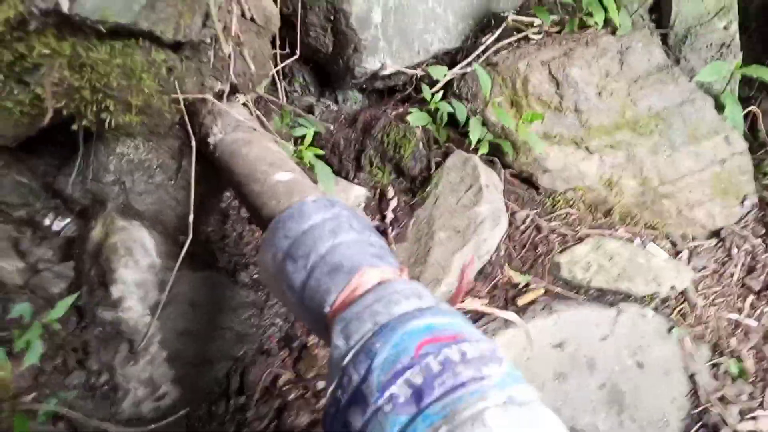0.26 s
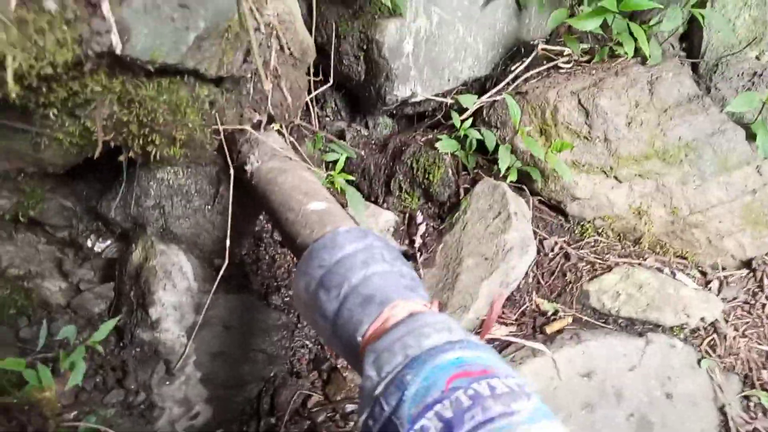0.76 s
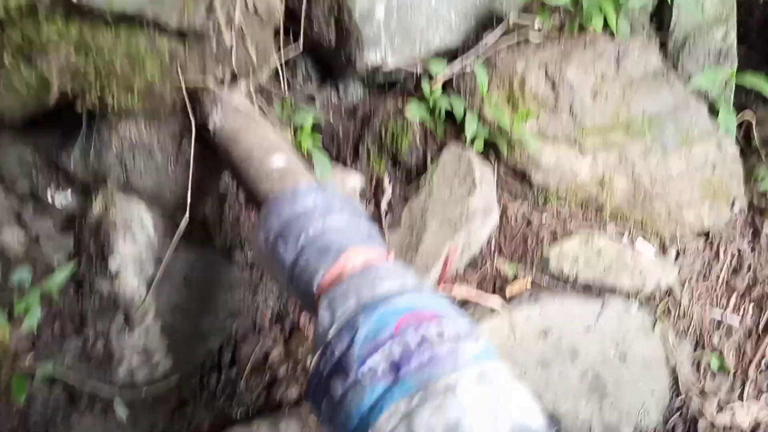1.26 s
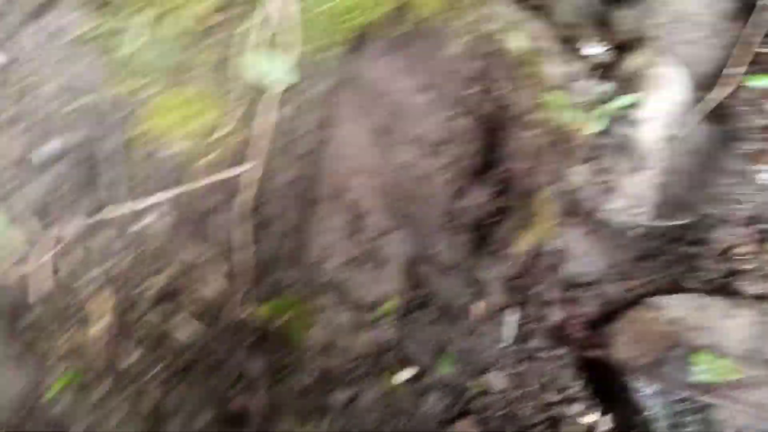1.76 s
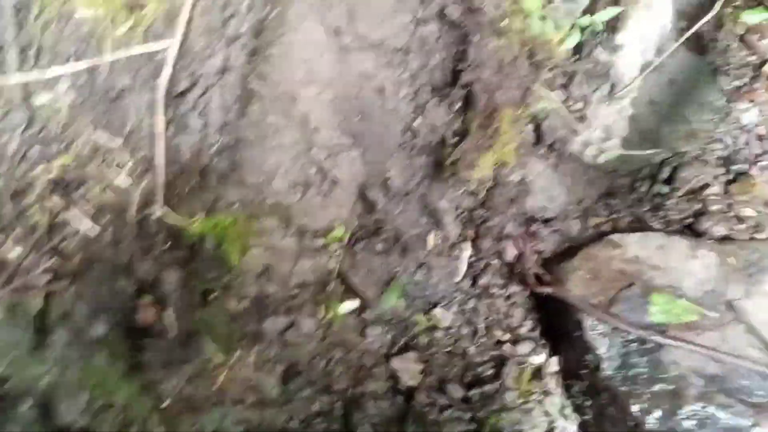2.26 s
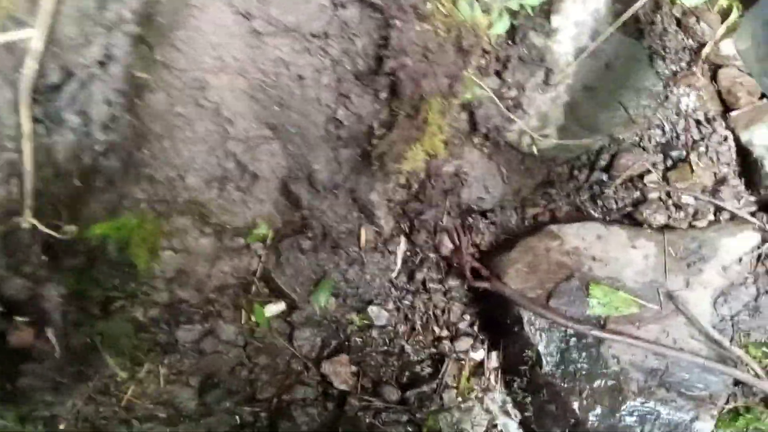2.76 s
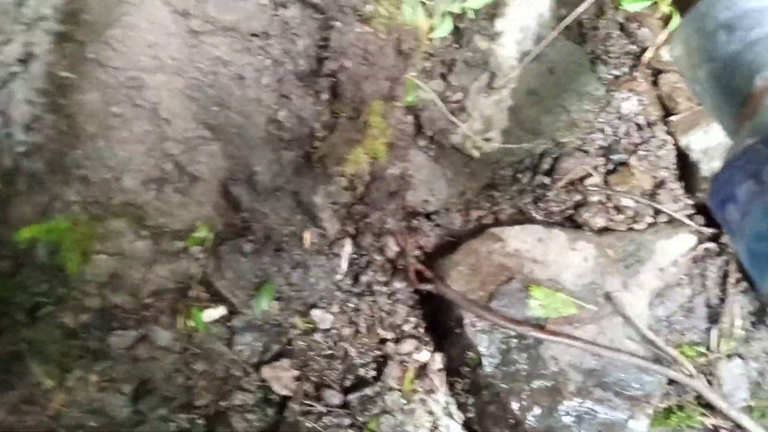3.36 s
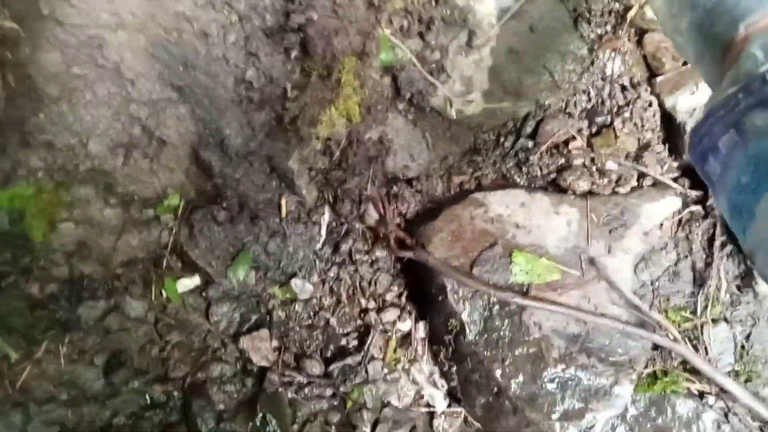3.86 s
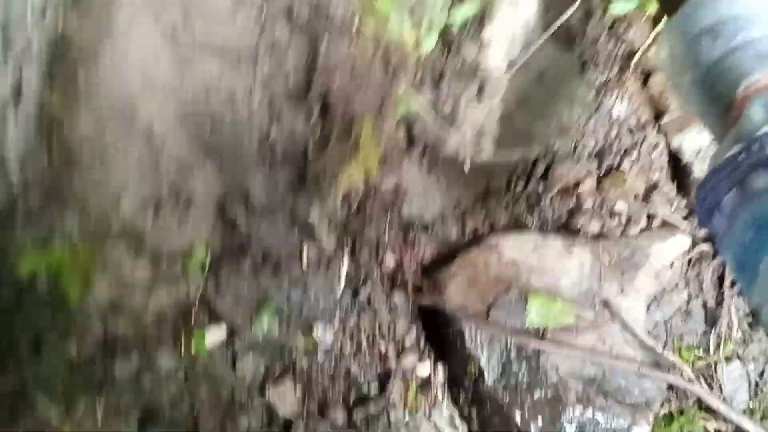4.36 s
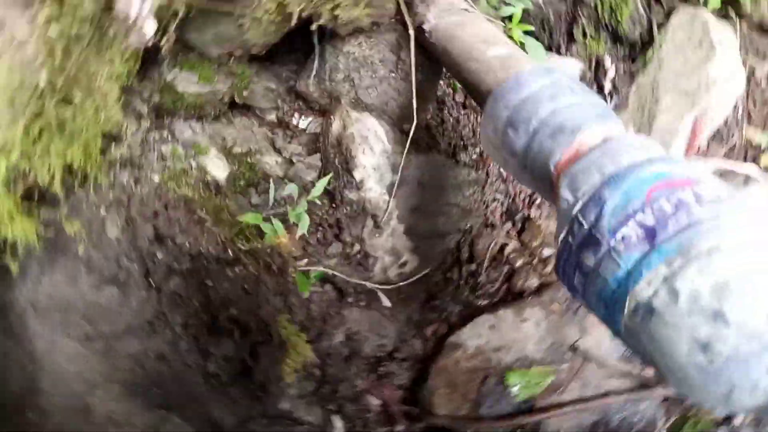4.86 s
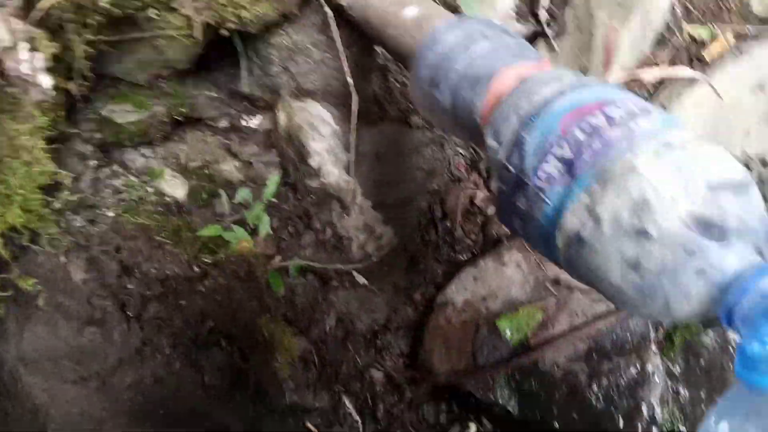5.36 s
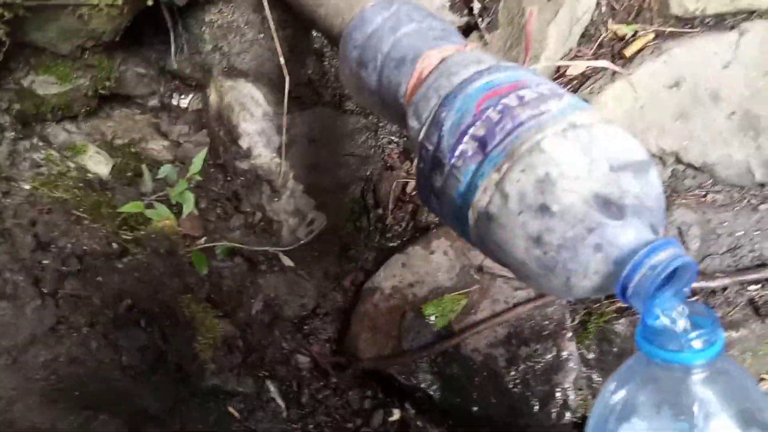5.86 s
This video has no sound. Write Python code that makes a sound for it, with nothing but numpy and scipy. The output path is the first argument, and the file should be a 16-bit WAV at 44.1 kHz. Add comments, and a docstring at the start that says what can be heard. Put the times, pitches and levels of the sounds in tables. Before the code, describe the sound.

Spring water patters and drips on wet stones, feet crunch on grit, a plastic bottle snaps, then the stream drums into it.

```python
"""Spring water from a spout patters on wet stones: impacts and tiny bubbles ring in the hollows of a rocky niche.
Someone shifts about on wet grit, heard as coloured crackle; stones knock underfoot.
An empty plastic bottle snaps loudly twice and faintly once, ringing in its modes, and hums faintly.
Near the end it is held under the stream, which drums on its bottom and rings the air inside."""
import sys
import numpy as np
from scipy import signal
from scipy.fft import rfft, irfft
from scipy.io import wavfile
from scipy.ndimage import uniform_filter1d

SR = 44100
rng = np.random.default_rng(int(sys.argv[2]) if len(sys.argv) > 2 else 0)


def digitize_waveform(pressure):
    """Quantize a signal to 16-bit integers and store it at the path in sys.argv[1].

    Rows of a 2-D input are taken as channels; values are limited to [-1, 1].
    """
    field = np.atleast_2d(pressure).T
    bounded = np.clip(field, -1, 1)
    quanta = np.round(bounded * 32767).astype(np.int16)
    wavfile.write(sys.argv[1], SR, quanta)


N = 269010
T = np.arange(N) / SR
AGE = T[:SR // 2]  # time since an event, s

# Resonances of the gaps between the stones. Each row: pitch in Hz, width in Hz, level in dB.
HOLLOWS = [(875, 220, -7), (1237, 41, -3.5), (1689, 95, -10), (2028, 440, -10), (2267, 45, -3.5),
           (2605, 60, -8), (2866, 55, -0.5), (3087, 146, 1), (3707, 130, -3), (3955, 100, -3.5),
           (4276, 140, -1.5), (4420, 93, -2.5), (5294, 87, -5), (6000, 76, -8), (6700, 140, -16.5)]
# Spectrum of wet grit, also of spatter in the bottle. Each row: frequency in Hz, level in dB.
GRIT = [(60, -12), (150, 6.5), (700, -51), (1500, -9.5), (2400, 0), (3600, 0.5), (5000, -4.5),
        (6600, -13.5), (8200, -29), (12000, -27.5), (15000, -25.5)]
# The stream enters the bottle, first grazing it, then fully. Each row: start in seconds, rise in seconds,
# hold in seconds, drumming gain in dB, spatter gain in dB (both before the sag).
FILL = [(5.371, 0.19, 0.17, -53, -53.5), (5.639, 0.012, 0.125, -50, -56.5),
        (5.757, 0.042, 0.34, -43.5, -54.5)]
DROPLET_LOW_HZ, DROPLET_HIGH_HZ = 842, 6470  # range of the tiny bubbles


def amp(db):
    """Decibels to gain."""
    return 10 ** (np.asarray(db) / 20)


def unit(x):
    """Scale to rms 1."""
    return x / np.sqrt(np.mean(x ** 2))


def peak(x, db):
    """Scale to a peak level."""
    return x * amp(db) / np.abs(x).max()


def fader(rows, axis=1):
    """Gain along a dB curve, -120 dB outside it."""
    rows = np.array(rows)
    return amp(np.interp(T, rows[:, 0], rows[:, axis], left=-120, right=-120))


def add(out, s, x):
    """Mix x in at time s."""
    i = max(int(s * SR), 0)
    out[i:i + len(x)] += x[:max(N - i, 0)]


def fade(t60, t=AGE):
    """Exponential decay, 60 dB in t60 seconds."""
    return np.exp(-np.log(1000) * t / t60)


def swell(s, held_s, attack_s, t60, sag_db_per_s):
    """Gain that rises at s, sags slowly while held, then dies away."""
    age = np.maximum(T - s, 0)
    attack = np.minimum(age / attack_s, 1)
    return attack * amp(-sag_db_per_s * age) * fade(t60, np.maximum(age - held_s, 0))


def walk(per_s):
    """Random levels (1000 at most), held for 1 / per_s seconds and smoothed; rms 1."""
    hold = int(SR / per_s)
    steps = rng.standard_normal(1000)[np.minimum(np.arange(N) // hold, 999)]
    return unit(uniform_filter1d(uniform_filter1d(steps, hold // 2), hold // 2))


def colour(x, points, size=2048):
    """Causal minimum-phase filter with a spectrum of (Hz, dB) points."""
    hz, db = np.transpose(points)
    f = np.maximum(np.arange(size // 2 + 1) * SR / size, 1)
    cepstrum = irfft(np.log(amp(np.interp(np.log(f), np.log(hz), db))))
    # fold the cepstrum onto positive time
    cepstrum[1:size // 2] *= 2
    cepstrum[size // 2 + 1:] = 0
    response = irfft(np.exp(rfft(cepstrum)))
    return signal.fftconvolve(x, response)[:len(x)]


def treble_shelf(x, db):
    """Raise or cut the treble, fully from 10 kHz up."""
    return colour(x, [(6500, 0.034), (10000, db)])


def resonate(x, modes):
    """Drive a set of (Hz, width Hz, dB) resonances, of alternating sign."""
    ring = 0
    for k, (hz, width, db) in enumerate(modes):
        decay = amp(db) * width * np.exp(-np.pi * width * AGE)
        ring = ring + decay * np.sin(2 * np.pi * hz * AGE) * (-1) ** k
    return signal.fftconvolve(x, ring)[:len(x)]


def hollows(x):
    """Splashes ring in the gaps between the stones, with deep dips between the resonances."""
    open_db = -18.5  # share that bypasses the hollows
    t = AGE[:SR // 30]
    ring = 0
    for hz, width, db in HOLLOWS:
        decay = amp(db) * 2 * np.pi * width / SR * np.exp(-np.pi * width * t)
        ring = ring + decay * np.cos(2 * np.pi * hz * t)
    dulled = colour(x, [(6600, -0.5), (7800, -7.0), (12000, -13.5)])
    return signal.fftconvolve(dulled, ring)[:len(x)] + amp(open_db) * x


def niche(x, wet_db, t60):
    """Close rock faces return a short spray of reflections."""
    echoes = crackle(len(AGE), 1200, 2.1) * fade(t60) * (AGE > .002)
    echoes = echoes / np.sqrt(np.sum(echoes ** 2))
    return x + amp(wet_db) * signal.fftconvolve(x, echoes)[:N]


def crackle(count, rate, spread_db):
    """Random impacts (rate per second over count samples), mostly small and a few large; rms 1."""
    sizes = amp(spread_db * np.minimum(rng.exponential(size=count), 4))
    return unit((rng.random(count) < rate / SR) * sizes * rng.choice([-1, 1], count))


def bubble(hz, t60, rise_s, glide):
    """A bubble swells, rings and climbs in pitch (by share glide per t60) as it nears the surface."""
    t = T[:int((t60 + rise_s) * SR)]
    onset = 1 - np.exp(-(t / rise_s) ** 2)
    return onset * fade(t60, t) * np.sin(2 * np.pi * hz * (t + glide * t ** 2 / (2 * t60)))


def bubbles(count, low_hz, high_hz, lean, cycles, spread_db):
    """A swarm of short bubbles of all sizes; a lean under 1 favours the small, high ones."""
    out = np.zeros(N)
    for when, pitch, size, ring, climb in rng.random((count, 5)):
        hz = low_hz * (high_hz / low_hz) ** (pitch ** lean)
        life_s = cycles * (.5 + ring) / hz
        blip = bubble(hz, life_s, life_s / 4, 0.046 * climb)
        add(out, when * T[-1], blip * amp(-spread_db * np.sqrt(size)))
    return unit(out)


def wash():
    """Seeping water as faint, steady coloured noise."""
    # Spectrum. Each row: frequency in Hz, level in dB.
    wash_spectrum = [(30, -15.5), (100, 6), (300, 13.5), (600, 7), (1500, -2), (3500, -12.5), (6000, -14.5),
                     (8000, -25), (12000, -20), (15500, -34.5)]
    return amp(-80.5) * unit(colour(rng.standard_normal(N), wash_spectrum))


def hum():
    """The air in the empty bottle sways through its neck: a sine plus narrow resonant noise."""
    # The air swells as the bottle is moved. Each row: start in seconds, hold in seconds, level in dB before sag.
    sways = [(2.86, 0.32, -63), (4.339, 0.072, -38.5)]
    hum_hz = 133.4
    attack_s, t60_s, sag_db_per_s = 0.082, 0.55, 5.5
    waver = unit(resonate(rng.standard_normal(N), [(hum_hz, 18, 0)]))
    sway = sum(amp(db) * swell(s, held_s, attack_s, t60_s, sag_db_per_s) for s, held_s, db in sways)
    return unit(np.sin(2 * np.pi * hum_hz * T) + 0.38 * waver) * sway


def scuffs():
    """A shoe presses the ground: a dull thud and rocking stones under crunching grit, giving way in lumps."""
    # Shoes on wet grit. Each row: start in seconds, level in dB, rise in seconds, t60 in seconds,
    # grit in dB relative to the thud before the shelves, grit treble shelf in dB, thud bass shelf in dB.
    treads = [(0.203, -41, 0.02, 0.39, -5.5, -11, -7), (0.251, -31.5, .014, 0.11, 0.5, -8, -11),
              (0.949, -58, 0.036, 0.19, 7, -18, -11), (1.038, -35, 0.0019, 0.13, -5, -28, -3),
              (1.126, -51, 0.074, 0.15, -1.5, -1, -18), (1.298, -60.5, 0.015, 0.12, 3, -7, 26.5),
              (1.386, -36.5, 0.016, 0.08, -5.5, 0, -2), (1.417, -39.5, 0.017, 0.24, -5, -14, -7),
              (2.571, -58, 0.047, 0.053, 16.5, 10, 13.5), (2.66, -47.5, 0.0023, 0.017, 22.5, -23, -29),
              (3.482, -40.5, 0.0089, 0.39, -0.5, 0, -8), (3.671, -44.5, 0.0034, 0.25, -1, 6, -13)]
    # Thud spectrum. Each row: frequency in Hz, level in dB.
    thud_spectrum = [(30, -50), (70, -11), (150, 13.5), (260, 3), (400, -19.5), (600, 7), (850, -12),
                     (1300, -2.5), (3000, -27), (12000, -40)]
    # Loose stones rocking underfoot. Each row: pitch in Hz, width in Hz, level in dB.
    ground_modes = [(188, 66, -2.5), (397, 34, 1), (570, 36, 3.5), (665, 51, 2.5), (875, 43, -4.5)]
    bass_hz, body_hz = 89.5, 260  # bass shelf: full below the first, none above the second
    lump_db, lumps_per_s = 3, 130  # the ground gives way unevenly
    out = np.zeros(N)
    for s, db, rise_s, t60, grit_db, treble_db, bass_db in treads:
        push = np.minimum(AGE / rise_s, 1) * fade(t60, np.maximum(AGE - rise_s, 0))
        slips = crackle(len(AGE), 1100, 1.5)
        thud = amp(-0.5) * unit(colour(slips, thud_spectrum))
        thud = thud + amp(-2.5) * unit(resonate(slips, ground_modes))
        thud = colour(thud, [(bass_hz, bass_db), (body_hz, 0)], size=4096)
        grit = treble_shelf(unit(colour(crackle(len(AGE), 1300, 0.99), GRIT)), treble_db)
        add(out, s, amp(db) * push * (thud + amp(grit_db) * grit))
    return out * amp(lump_db * walk(lumps_per_s))


def knocks():
    """A stone tips under the shoe, thumps on its bed and crushes a few coarse grains."""
    # Each row: start in seconds, thump peak in dB, crunch peak in dB.
    tips = [(0.233, -44, -40), (0.265, -31, -24.5), (1.0405, -27.5, -35), (1.397, -33, -25),
            (1.445, -36, -37), (3.492, -34, -28)]
    # Thump resonances. Each row: pitch in Hz, width in Hz, level in dB.
    knock_modes = [(182, 63, -0.5), (393, 115, -8), (680, 36, -0.5)]
    # Crunch spectrum. Each row: frequency in Hz, level in dB.
    crunch_spectrum = [(200, -17), (800, 0.5), (1100, -12), (1700, 1), (2600, -3), (6500, -9), (8200, -31)]
    out = np.zeros(N)
    for s, thump_db, crunch_db in tips:
        add(out, s, peak(resonate(fade(0.00079), knock_modes), thump_db))
        grains = crackle(len(AGE), 1400, 2.6) * fade(0.073)
        add(out, s, peak(colour(grains, crunch_spectrum), crunch_db))
    return out


def snaps():
    """The thin wall buckles with a crack, rattles briefly and leaves the bottle ringing."""
    # Each row: start in seconds, crack gain in dB, treble shelf in dB, rattle bass shelf in dB,
    # ring gain in dB, pitch factor, length factor.
    buckles = [(1.8295, -10, -9, -2, -27, 1.35, 0.33), (2.6612, -33, -8, -4, -51, 0.84, 0.67),
               (4.5613, -10, 6, -14, -24.5, 1.0, 1)]
    # Bottle modes before those factors. Each row: pitch in Hz, level in dB, t60 in seconds.
    bottle_modes = [(265, -9, .11), (384, -7, .1), (456, -.5, .14), (545, -7, .07), (647, -.5, .16),
                    (786, -11, .08), (964, -12, .07), (1203, 1.5, .1), (1385, -10, .07), (1530, -13, .07),
                    (1855, -4, .13), (2387, -11, .08), (2512, -8, .08), (2575, -10, .07), (3184, -3, .045),
                    (3453, 5, .06), (3720, -3, .047), (3975, 0, .035), (4025, 1, .035), (4500, -8, .06),
                    (4721, -11, .07), (5232, -15, .07)]
    # Rattle spectrum. Each row: frequency in Hz, level in dB.
    rattle_spectrum = [(30, -23.5), (80, -4), (200, 7), (420, -18), (700, -3), (1100, -5.5), (2400, -6.5),
                       (4000, 7), (5200, -3.5), (6800, -8), (8200, -24.5), (12000, -27), (15000, -28)]
    buzz_db = 1.5  # the creased wall rings unevenly
    out = np.zeros(N)
    for s, crack_db, treble_db, bass_db, ring_db, pitch, length in buckles:
        crack = resonate(signal.unit_impulse(len(AGE)), [(3730, 700, -8.0), (4940, 1500, -18.0)])
        rattle = unit(colour(rng.standard_normal(len(AGE)), rattle_spectrum))
        rattle = rattle * (fade(0.027) + amp(3.0) * fade(0.04 * length))
        rattle = colour(rattle, [(150, bass_db), (330, 0)])
        ring = 0
        for hz, db, t60 in bottle_modes:
            tone = np.sin(2 * np.pi * (hz * pitch * AGE + rng.random()))
            ring = ring + amp(db) * fade(t60 * length) * tone
        buzz = amp(buzz_db * walk(per_s=440)[:len(AGE)])
        ring = ring * buzz * np.minimum(AGE / 0.004, 1)
        burst = treble_shelf(peak(crack, 0) + amp(-10) * rattle, treble_db)
        add(out, s, amp(crack_db) * burst + amp(ring_db) * ring)
    return out


def drumming():
    """The falling water keeps the bottle's resonances ringing while they glide and slosh."""
    # The three lowest resonances shift as the bottle tilts and water gathers.
    # Each row: time in seconds, air in Hz, bottom in Hz, wall in Hz (all before sloshing).
    glides = [(5.40, 193, 264, 638), (5.50, 161, 306, 637), (5.68, 170, 313, 637), (5.78, 158, 286, 636),
              (5.83, 159, 359, 612), (5.951, 154, 320, 620), (6.08, 138.5, 320, 670)]
    # Air, bottom and wall. Each row: width in Hz, level in dB, fading in dB per second once the stream
    # is fully in (negative grows).
    drum_modes = [(34.2, -1.5, -9), (54.4, -5.5, 32), (40, -14, 8)]
    # The whole wall drumming. Each row: frequency in Hz, level in dB.
    rumble_spectrum = [(50, -42), (112, 9), (220, 9), (370, -13), (470, -17), (730, -30), (900, -11),
                       (3000, -51)]
    slosh, slosh_per_s = 0.028, 36  # pitch wavers by this rms share
    gulp_db, gulps_per_s = 5, 26  # the resonances come and go with the stream
    rumble_db, rumble_sag_db_per_s = 0.5, 31  # gathering water damps the wall
    times, *tracks = np.transpose(glides)
    filled_s = np.maximum(T - FILL[-1][0], 0)
    rumble = unit(colour(crackle(N, 1100, 0.91), rumble_spectrum))
    out = amp(rumble_db) * rumble * amp(-rumble_sag_db_per_s * filled_s)
    for track, (width, db, sag) in zip(tracks, drum_modes):
        hz = np.interp(T, times, track) * (1 + slosh * walk(slosh_per_s))
        turn = np.exp(2j * np.pi * np.cumsum(hz) / SR)
        # ring at 0 Hz, then shift up to the gliding pitch
        decay = AGE * np.exp(-np.pi * width * AGE)
        ring = signal.fftconvolve(crackle(N, 960, 1.4) / turn, decay)[:N]
        out += amp(db - sag * filled_s + gulp_db * walk(gulps_per_s)) * unit((ring * turn).real)
    return out


def filling():
    """The stream drums on the bottle's bottom, spatters its walls in spurts and froths in the first water."""
    # Slugs of water that hit the bottle. Each row: start in seconds, thump peak in dB, spatter peak in dB,
    # pitch of the trapped bubbles in Hz.
    slugs = [(5.369, -78, -44, 4040), (5.454, -62, -38, 3120), (5.52, -41.5, -35, 2950),
             (5.547, -41.5, -38.5, 2340), (5.648, -33, -56, 2950), (5.6886, -38, -25, 3130),
             (5.7748, -44, -30.5, 3410), (5.790, -35.5, -33, 3060), (5.799, -44, -45, 4570),
             (5.816, -36, -34.5, 3080), (5.844, -52, -31, 2340), (5.8824, -39, -29, 2340),
             (5.907, -49, -35.5, 2370), (5.92, -40.5, -28, 2290), (5.9503, -44, -32, 2180),
             (5.988, -57, -37, 2120), (6.026, -67, -40.5, 2140), (6.0422, -62, -31, 2420)]
    # Resonances of thump and spatter. Each row: pitch in Hz, width in Hz, level in dB.
    thump_modes = [(170, 34, -17.5), (317, 6.5, -15), (624.4, 17, -20)]
    spatter_modes = [(997, 8.9, 7.3), (1196, 24, 12.7), (1860, 28, 1), (2195, 180, 14), (2603, 43, 16.6),
                     (3140, 520, 13.3), (3730, 310, 11.2), (3990, 320, 14.6), (4750, 200, 4.4)]
    fill_t60_s, fill_sag_db_per_s, spurt_db = 0.077, 18, 4
    slug_t60_s, slug_ring_db, slug_ring_width_hz, slug_spray_db = 0.026, 3.5, 180, -6.5
    drum = drumming()
    hits = crackle(N, 1100, 3.5)
    spatter = unit(resonate(hits, spatter_modes)) + amp(2.0) * unit(colour(hits, GRIT))
    spatter = treble_shelf(spatter, -1.8)
    froth = bubbles(count=1300, low_hz=1820, high_hz=3500, lean=1.63, cycles=18, spread_db=29)
    spray = (amp(-6.5) * spatter + amp(-6) * froth) * amp(spurt_db * walk(per_s=70))
    out = np.zeros(N)
    for s, rise_s, held_s, drum_db, spatter_db in FILL:
        stream = amp(drum_db) * drum + amp(spatter_db) * spray
        out += stream * swell(s, held_s, rise_s, fill_t60_s, fill_sag_db_per_s)
    for s, thump_db, spatter_db, hz in slugs:
        slap = rng.standard_normal(len(AGE)) * fade(slug_t60_s)
        burst = unit(resonate(slap, spatter_modes))
        burst = burst + amp(slug_ring_db) * unit(resonate(slap, [(hz, slug_ring_width_hz, 0)]))
        broadband = colour(slap, [(500, 2.0), (1100, 8.5), (6600, 4.5), (8000, -26)])
        burst = burst + amp(slug_spray_db) * unit(broadband)
        thump = colour(resonate(fade(0.0024), thump_modes), [(60, -11.0), (130, -7)])
        add(out, s, peak(thump, thump_db))
        add(out, s, peak(burst, spatter_db))
    return out


def ticks():
    """Fine drops flick bare stone close by with a short, bright tick."""
    # Each row: start in seconds, peak in dB before tick_gain_db.
    flicks = [(0.156, -58.5), (0.622, -65), (0.683, -66), (1.2613, -56.5), (1.347, -55.5), (1.497, -54),
              (2.0245, -61.5), (2.0825, -60), (2.254, -57), (2.8157, -57), (2.9033, -57), (3.1157, -62),
              (3.161, -57), (3.562, -57.5), (3.9294, -72), (3.9948, -55.5), (4.2665, -60), (4.4133, -57.5),
              (4.7173, -56), (4.8913, -63), (4.9965, -70), (5.1206, -69), (5.517, -58.5)]
    # Spectrum. Each row: frequency in Hz, level in dB.
    tick_spectrum = [(1000, -16), (4000, 3), (6300, 11), (8000, -6.5), (11000, -4.5), (15000, -9.5)]
    tick_gain_db, t60_s = 17.5, 0.042
    out = np.zeros(N)
    for s, db in flicks:
        flick = colour(rng.standard_normal(len(AGE)) * fade(t60_s), tick_spectrum)
        add(out, s, peak(flick, db + tick_gain_db))
    return out


def plops():
    """Short low plops: gulps in the puddle or bottle, and squelches under the shoe."""
    # Each row: start in seconds, peak in dB, nominal pitch in Hz, t60 in seconds.
    plop_rows = [(0.216, -38, 480, 0.082), (0.229, -33.5, 344, 0.089), (0.275, -45.5, 796, 0.29),
                 (0.368, -35.5, 170, 0.057), (0.41, -50.5, 219, 0.17), (0.772, -36.5, 380, 0.032),
                 (0.787, -44, 376, 0.027), (0.845, -44, 1280, 0.092), (1.038, -24, 427, 0.046),
                 (1.042, -37.5, 649, 0.16), (1.176, -43.5, 602, 0.057), (1.398, -33, 710, 0.16),
                 (1.428, -36.5, 687, 0.15), (1.612, -44, 736, 0.12), (1.655, -50, 346, 0.075),
                 (1.715, -49, 357, 0.048), (1.129, -44.5, 387, 0.062), (1.307, -51.5, 348, 0.13),
                 (2.097, -49.5, 80, 0.031), (2.484, -43, 116, 0.016), (2.680, -37.5, 656, 0.037),
                 (2.943, -44.5, 163, 0.036), (3.116, -42, 313, 0.076), (3.161, -39.5, 333, 0.012),
                 (3.471, -28, 577, 0.02), (3.49, -33, 772, 0.057), (3.561, -39, 607, 0.095),
                 (3.700, -39.5, 562, 0.028), (4.046, -44.5, 563, 0.07), (4.334, -45, 440, 0.069),
                 (4.848, -50.5, 448, 0.051), (4.888, -67, 1160, 0.087), (4.961, -61, 1120, 0.07),
                 (4.998, -51.5, 455, 0.057), (5.06, -51.5, 1080, 0.26), (5.391, -54.5, 198, 0.3),
                 (5.548, -42, 127, 0.084), (5.649, -33, 304, 0.075), (5.686, -41.5, 717, 0.046),
                 (5.716, -44.5, 715, 0.048), (5.751, -36, 156, 0.031), (5.776, -34, 160.4, 0.088),
                 (5.779, -42.5, 625, 0.25), (5.787, -40, 267, 0.085), (5.811, -36.5, 182, 0.029),
                 (5.852, -40, 363, 0.069), (5.915, -38, 168, 0.1)]
    out = np.zeros(N)
    for s, db, hz, t60 in plop_rows:
        # starts 3 % flat and climbs
        add(out, s, peak(bubble(hz * .97, t60, 1.5 / hz, .1), db))
    return out


def clumps():
    """A clump of water shatters into a dense volley of tiny impacts that ring in the hollows."""
    # Each row: start in seconds, length in seconds, level in dB, centre in Hz, fall-off in dB per octave.
    shatters = [(1.935, 0.019, -62, 2330, 1.5), (1.992, 0.012, -65.5, 4400, 11),
                (2.022, 0.0063, -57, 3070, 26), (2.051, 0.016, -57.5, 3600, 0),
                (2.107, 0.015, -61.5, 3850, 6), (2.173, 0.034, -61, 2780, 17), (2.215, 0.027, -60, 3250, 3),
                (2.253, 0.019, -54, 2500, 6), (2.302, 0.015, -53, 1290, 28), (2.457, 0.014, -63, 3030, 0.5),
                (3.175, 0.012, -67, 3700, 6.5), (3.247, 0.022, -59, 3000, 26),
                (3.395, 0.0081, -60, 2440, 27), (3.547, 0.01, -61.5, 2620, 4),
                (3.608, 0.015, -67, 3900, 24), (3.853, 0.024, -64, 2270, 10.5),
                (4.186, 0.014, -63.5, 3620, 22), (4.311, 0.029, -60.5, 3600, 3),
                (4.728, 0.013, -57.5, 2940, 8), (4.762, 0.01, -58, 2480, 15),
                (4.87, 0.032, -58.5, 1150, 22), (4.896, 0.027, -63, 2200, 24),
                (4.967, 0.038, -60, 2670, 11)]
    rise_s, t60_s, ring_db = 0.0049, 0.012, 8.5
    out, t = np.zeros(N), AGE[:SR // 10]
    for s, length_s, db, hz, slope_db in shatters:
        edges = np.minimum(t / rise_s, 1) * fade(t60_s, np.maximum(t - length_s, 0))
        volley = crackle(len(t), 2200, 2.1) * edges
        volley = colour(volley, [(hz / 4, -2 * slope_db), (hz, 0), (hz * 4, -2 * slope_db)])
        volley = treble_shelf(volley, -30)
        burst = unit(unit(volley) + amp(ring_db) * unit(hollows(volley)))
        # level refers to the clump's own length
        add(out, s, amp(db) * burst * np.sqrt(t[-1] / (length_s + rise_s)))
    return out


def rush():
    """Where the stream fans out on the rock, its drops merge into a thick, bubbling splatter."""
    # Each row: start in seconds, hold in seconds, level in dB before sag.
    spreads = [(1.818, 0.923, -51.5), (4.58, 0.564, -59)]
    attack_s, t60_s, sag_db_per_s = 0.049, 0.067, 12
    hits_per_s, hits_spread_db, hits_db = 1400, 2.3, -11
    ring_width_hz, ring_db = 42, 4
    hits = unit(treble_shelf(crackle(N, hits_per_s, hits_spread_db), -21.5))
    blips = bubbles(count=3600, low_hz=962, high_hz=4600, lean=0.98, cycles=28, spread_db=9)
    splatter = colour(amp(hits_db) * hits + blips, [(1200, 2), (3000, 0), (4500, -1), (6500, 0)])
    splatter = splatter * amp(2 * walk(per_s=70))
    singing = resonate(splatter, [(hz, ring_width_hz, db) for hz, _, db in HOLLOWS])
    spread = sum(amp(db) * swell(s, held_s, attack_s, t60_s, sag_db_per_s) for s, held_s, db in spreads)
    return unit(unit(hollows(splatter)) + amp(ring_db) * unit(singing)) * spread


def splash(hz, count=7):
    """A burst of tiny bubbles scattered round one pitch, with a noisy slap, ringing in the hollows."""
    octaves, span_s, ring_s, slap_db = 1.644, 0.0043, 0.0025, -9
    out = np.zeros(N)
    for lag, pitch, size in rng.random((count, 3)):
        f = min(hz * 2 ** (octaves * (pitch - .5)), DROPLET_HIGH_HZ)
        add(out, span_s * lag ** 2, bubble(f, ring_s, ring_s / 6, 0.17) * amp(-9 * size))
    slap = rng.standard_normal(SR // 20) * fade(.009, AGE[:SR // 20])
    return hollows(unit(out[:len(slap)]) + amp(slap_db) * unit(slap))


def drops(count=3):
    """Each big drop slaps the wet stone and rings with two close, short-lived tones that beat; small satellites
    join."""
    # Each row: start in seconds, peak in dB, bubble pitch in Hz, splash in dB relative to the bubbles.
    big_drops = [(0.0074, -33, 3200, 17), (0.062, -41, 1634, -9), (0.154, -30.5, 3120, 25),
                 (0.3365, -28, 4100, 26), (0.453, -35, 4720, 7), (0.508, -36.5, 3226, 20),
                 (0.5787, -36.5, 1970, -33), (0.5972, -27, 2400, -16), (0.625, -34, 4460, 3),
                 (0.673, -34.5, 3230, -11), (0.682, -32, 4870, 3), (0.938, -29, 4320, -19),
                 (0.975, -31.5, 4290, -2), (0.987, -32, 3870, -11), (1.261, -39, 3700, 18),
                 (1.599, -34, 3700, -11), (1.661, -32, 3050, 8), (1.708, -34.5, 3850, 6),
                 (1.8743, -17.5, 2910, 1.5), (1.9397, -33.5, 2670, -2), (1.9574, -30.5, 1640, -10),
                 (2.0263, -45, 3070, 0), (2.0525, -34, 4070, 7), (2.084, -32, 4100, -8),
                 (2.1208, -33.5, 3130, 2), (2.146, -35, 1670, -24), (2.308, -33, 1220, 3),
                 (2.331, -28, 3860, 8), (2.388, -32, 4500, 3), (2.528, -34.5, 1225, -29),
                 (2.547, -29.5, 4010, 11), (2.815, -30.5, 5110, 4), (2.8525, -31, 3980, -15),
                 (2.865, -32, 3660, 6), (2.882, -29.5, 2940, -21), (2.903, -28, 4400, 12),
                 (2.969, -25.5, 3010, -2), (3.041, -28, 4720, 27), (3.1, -29.5, 2930, -1.5),
                 (3.113, -39, 3660, -4), (3.161, -45, 4050, -1), (3.254, -40, 3080, -23),
                 (3.27, -34, 3090, -10), (3.337, -35, 4030, 8), (3.392, -34, 2140, -18),
                 (3.4, -40, 3020, -23), (3.676, -26.5, 4640, -2), (3.915, -32.5, 6330, -1),
                 (3.929, -35.5, 2750, 12), (3.9615, -32.5, 3110, -1), (3.98, -34, 3700, 8),
                 (3.996, -32.5, 4400, -13), (4.0486, -33, 4030, 13), (4.147, -35, 3650, 7),
                 (4.19, -36, 3990, -16), (4.291, -33.5, 2810, -3), (4.319, -36, 1715, 2),
                 (4.3543, -27, 2760, 3.5), (4.4562, -31.5, 2220, 5), (4.472, -34, 2930, 5),
                 (4.6114, -24.5, 3950, -14), (4.636, -28, 3800, 2), (4.689, -35.5, 3040, -9),
                 (4.7139, -15, 2950, -16), (4.7654, -26.5, 3180, -19), (4.783, -24.5, 4550, -39),
                 (4.788, -27, 2960, -8.5), (4.801, -31, 4800, -24), (4.831, -36, 3920, 0),
                 (4.868, -33.5, 2760, 12), (4.894, -32.5, 2130, 18), (4.925, -38, 4300, -7),
                 (4.968, -37.5, 2800, 8), (4.997, -40, 1300, -18), (5.03, -36, 3770, -1.5),
                 (5.078, -38.5, 2390, 8), (5.111, -39, 4330, -20), (5.122, -33.5, 2540, 12),
                 (5.236, -58, 2000, -7), (5.309, -50.5, 3200, 12)]
    bubble_t60_s, bubble_rise_s, max_split = 0.016, .004, 0.054  # split: detuning share either way
    satellite_db, satellite_spread_db, satellite_octaves = -16.5, 25.5, 0.72
    satellite_lead_s, satellite_span_s = 0.0083, 0.039
    out = np.zeros(N)
    for s, db, hz, splash_db in big_drops:
        drop = peak(splash(hz), splash_db)
        split = max_split * rng.uniform(0.44, 1)
        pair = sum(bubble(hz * (1 + side * split), bubble_t60_s, bubble_rise_s, 0) for side in (-1, 1))
        drop[:len(pair)] += peak(pair, 0)
        add(out, s, peak(drop, db))
        for lag, pitch, size in rng.random((count, 3)):
            satellite = bubble(hz * 2 ** (satellite_octaves * (pitch - .5)), 0.004, 0.00091, 0.034)
            satellite = hollows(np.pad(satellite, (0, SR // 50)))  # room to ring
            satellite = peak(satellite, db + satellite_db - satellite_spread_db * size)
            add(out, s - satellite_lead_s + satellite_span_s * lag, satellite)
    return out


def droplets(count=440):
    """Droplets land in clumps of eight shards; each traps a tiny bubble that rings for some cycles."""
    droplet_spread_db, shard_spread_db, shatter_s = 20, 21, 0.03
    ring_at_3khz_s, rise_share = .0075, .25
    out = np.zeros(N)
    for (when, size), shards in zip(rng.random((count, 2)), rng.random((count, 8, 3))):
        for pitch, lag, share in shards:
            hz = DROPLET_LOW_HZ * (DROPLET_HIGH_HZ / DROPLET_LOW_HZ) ** pitch ** .7
            life_s = ring_at_3khz_s * (3000 / hz) ** .6
            db = -droplet_spread_db * size - shard_spread_db * share
            blip = bubble(hz, life_s, life_s * rise_share, 0.055)
            add(out, when * T[-1] + shatter_s * lag ** 2, blip * amp(db))
    return unit(out)


def trickle():
    """The stream breaks into droplets and fine spray, in uneven spurts; hollows and puddle ring along."""
    # The stream before gains and spurts. Each row: time in seconds, patter on the stones in dB,
    # gurgle in the puddle in dB.
    stream_levels = [(0.0, -50.5, -68.5), (0.18, -54, -64), (0.75, -59, -69.5), (1.18, -53, -60.5),
                     (1.46, -61.5, -75.5), (1.92, -47.5, -58), (2.02, -46, -67.5), (3.35, -55.5, -73.5),
                     (3.57, -54.5, -77.5), (3.96, -55.5, -68.5), (4.81, -55, -71.5), (5.3, -82.5, -71)]
    # Resonances of the puddle's hollow. Each row: pitch in Hz, width in Hz, level in dB.
    puddle_modes = [(343, 54, 17), (666, 44, -25.5)]
    # Spectrum of the seeping patter. Each row: frequency in Hz, level in dB.
    seep_spectrum = [(100, -13.5), (330, -22.5), (800, -13), (1300, -4.5), (2000, -6), (3000, 0.5),
                     (4300, -5), (5400, -16), (6600, -15.5), (8000, -13), (12000, -14), (15000, -19)]
    patter_gain_db, gurgle_gain_db, puddle_db = -2, 4.5, 3  # puddle relative to the gurgling bubbles
    spray_per_s, spray_spread_db, spray_db = 260, 4, -14
    seep_db, spurt_db = -67.5, 5  # patter that never stops; spread of the spurts
    caught_s, caught_db_per_s = 5.08, 145  # the bottle takes the stream off the stones
    spray = unit(treble_shelf(crackle(N, spray_per_s, spray_spread_db), -3.5))
    patter = unit(hollows(droplets() + amp(spray_db) * spray))
    gurgle = bubbles(count=1100, low_hz=222.5, high_hz=1745, lean=0.904, cycles=10.8, spread_db=33.5)
    gurgle = unit(gurgle + amp(puddle_db) * unit(resonate(crackle(N, 130, 6.1), puddle_modes)))
    on_stones = amp(-caught_db_per_s * np.maximum(T - caught_s, 0))
    stream = amp(patter_gain_db) * patter * fader(stream_levels)
    stream = stream + amp(gurgle_gain_db) * gurgle * fader(stream_levels, axis=2)
    seep = unit(treble_shelf(colour(crackle(N, 1600, 1.9), seep_spectrum), -15.5))
    spurts = amp(spurt_db * np.minimum(walk(per_s=79), 2))
    return (on_stones * stream + amp(seep_db) * seep) * spurts


def scene():
    """Water, feet and bottle among the rocks, over a faint wash of seeping water."""
    niche_t60_s = .085
    water = trickle() + drops() + clumps() + rush() + ticks() + plops()
    water = niche(water, wet_db=-10, t60=niche_t60_s)
    handling = scuffs() + knocks() + snaps() + filling()
    handling = niche(handling, wet_db=-12, t60=niche_t60_s)
    return (water + handling + hum() + wash())[None]


def record(dry):
    """Overall tone: weak bass, a dip near 13 kHz, a narrow peak near 15 kHz, nothing above 16.3 kHz."""
    # Tone curve. Each row: frequency in Hz, level in dB.
    tone_curve = [(25, -29.5), (50, -8.5), (90, 1.5), (13000, -9.5), (14200, -5.5), (15200, 9.5),
                  (15800, -9), (16500, -13.5)]
    top_hz = 16300
    low_pass = signal.ellip(8, .2, 70, top_hz, fs=SR, output="sos")
    return signal.sosfilt(low_pass, colour(dry[0], tone_curve))[None]


dry = scene()
out = record(dry)
digitize_waveform(out)
```